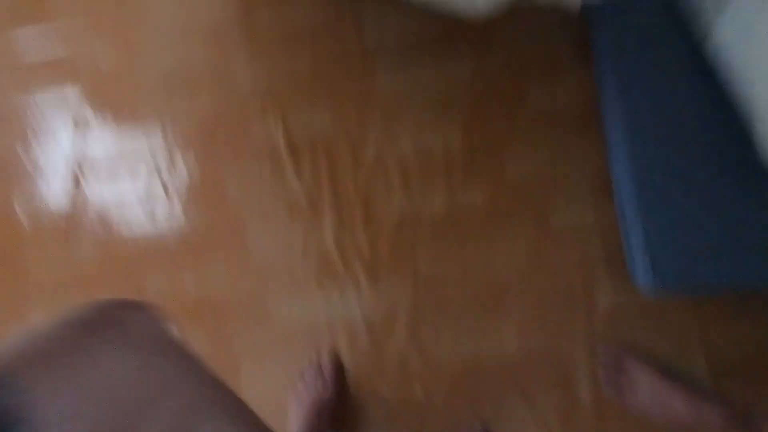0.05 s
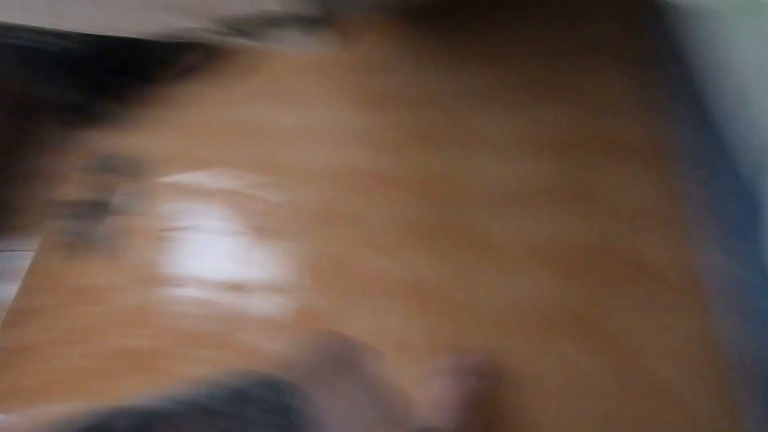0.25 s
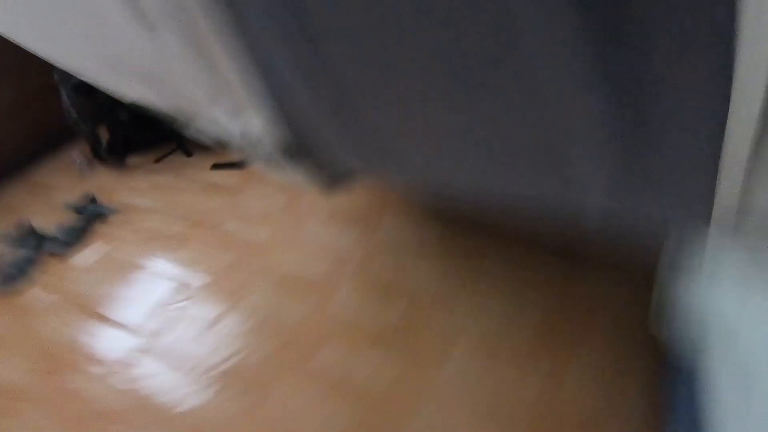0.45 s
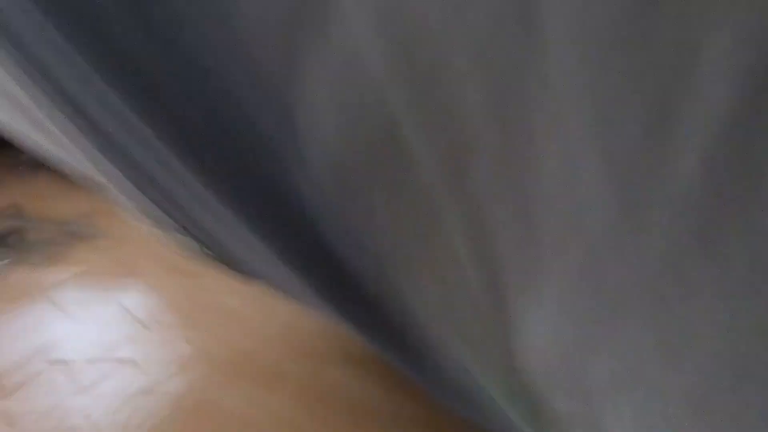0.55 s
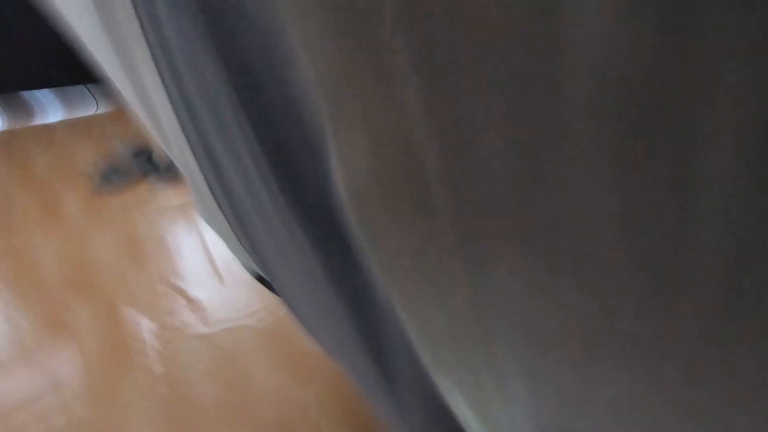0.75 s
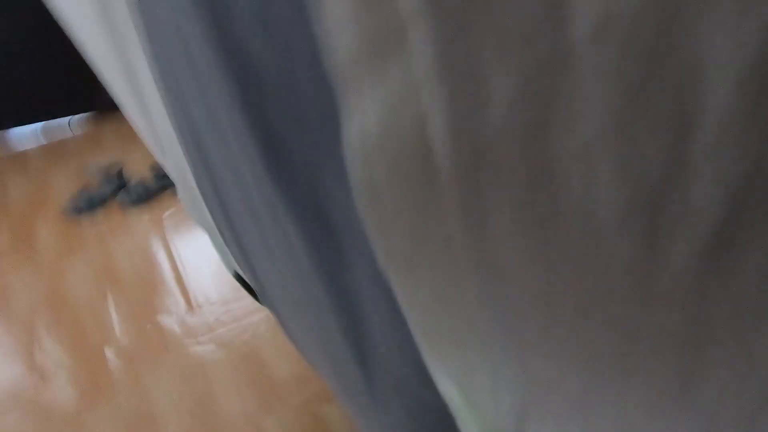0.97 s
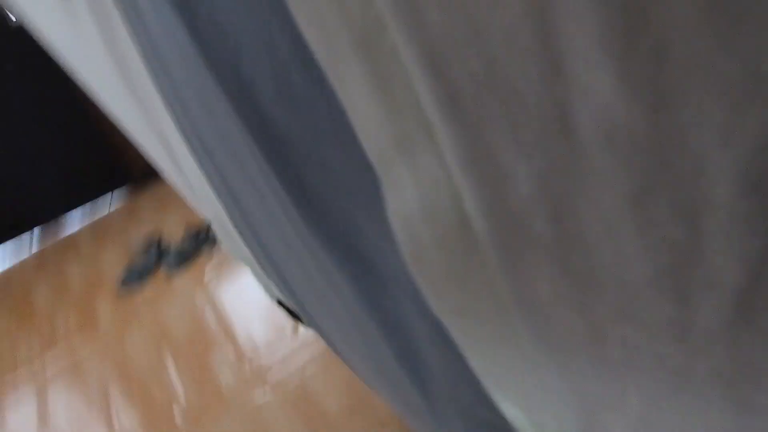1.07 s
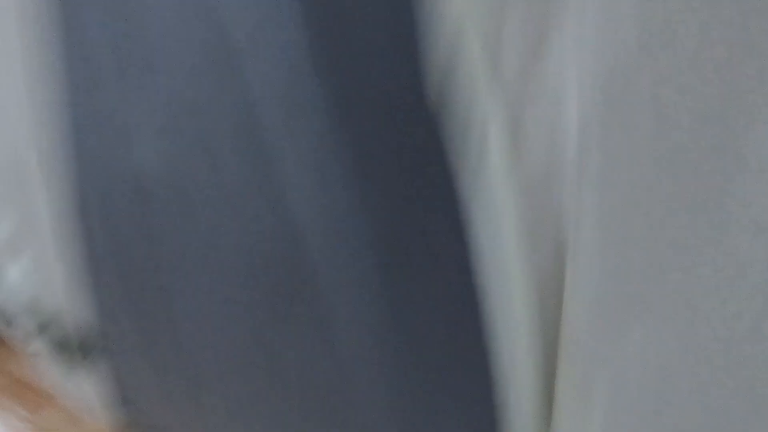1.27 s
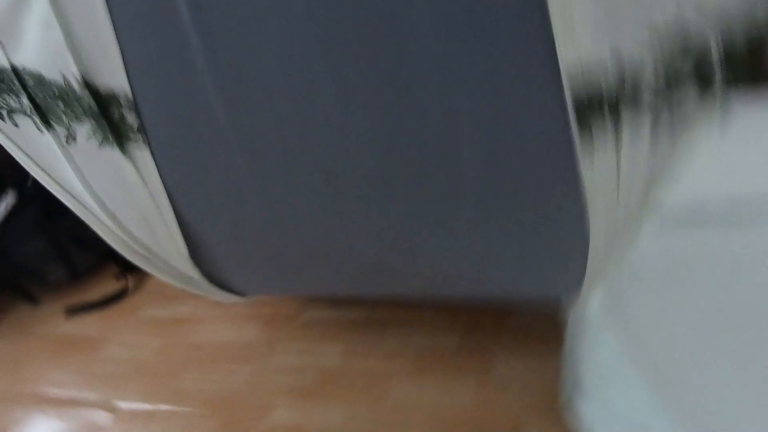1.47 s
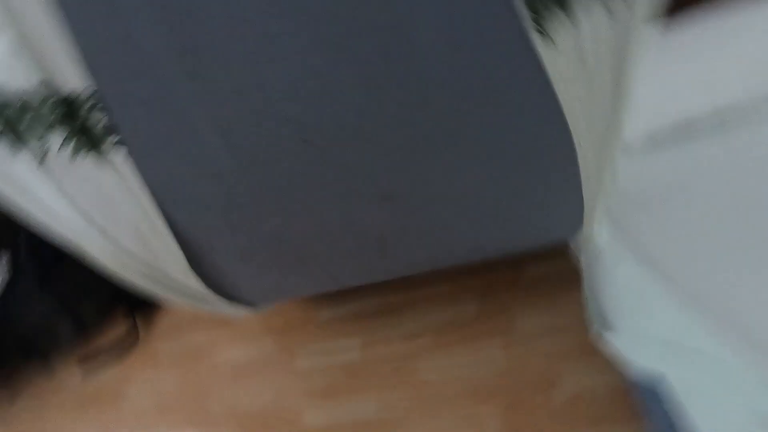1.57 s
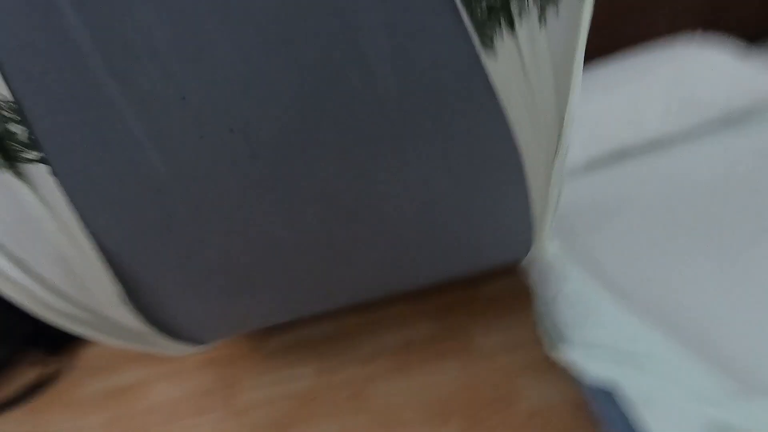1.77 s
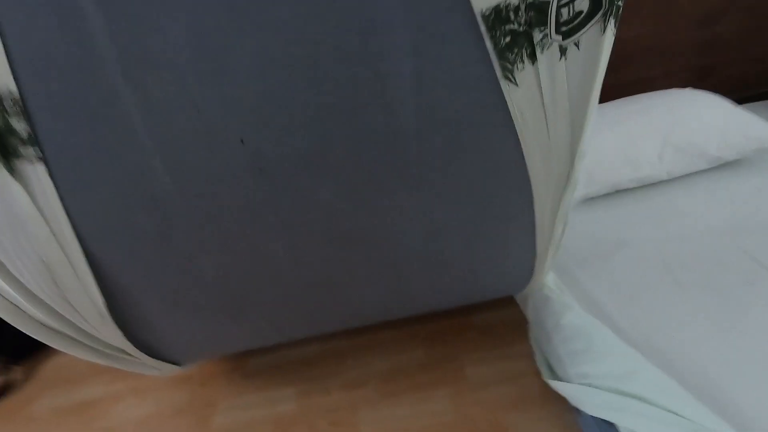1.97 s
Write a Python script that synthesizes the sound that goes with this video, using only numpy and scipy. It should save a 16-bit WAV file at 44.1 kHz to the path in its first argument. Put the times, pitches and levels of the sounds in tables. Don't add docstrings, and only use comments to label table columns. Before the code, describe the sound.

Close hand-held pickup in a small quiet room: a foam mattress is lifted, its sheet rustling lightly, low air bumps swelling to a sharp wooden knock, then dull taps, rubbing, tiny squeaks, another low buffet and near quiet.

```python
import sys
import numpy as np
from scipy import signal
from scipy.fft import rfft, irfft
from scipy.io import wavfile
from scipy.ndimage import uniform_filter1d

SR = 44100
rng = np.random.default_rng(int(sys.argv[2]) if len(sys.argv) > 2 else 0)


def volts_from_decibels(level):
    exponent = np.asarray(level, float) / 20
    return 10 ** exponent


def int16_out(signal):
    q = np.round(np.clip(np.atleast_2d(signal).T, -1, 1) * 32767)
    wavfile.write(sys.argv[1], SR, q.astype(np.int16))


N = 89037

# (start [s], length [s], level [dB], flutter top [Hz], slope [dB/octave])
GUSTS = [(0., 0.22, -48, 278, -3.5), (0.195, 0.19, -38, 257, -5.5), (0.336, 0.077, -32, 122, 7),
         (0.383, 0.15, -29.5, 285, -1.4), (0.505, 0.11, -29.5, 205, -4), (0.61, 0.14, -33.5, 226, -7.5),
         (0.662, 0.51, -48, 350, -8), (1.039, 0.12, -48, 307, -6), (1.131, 0.17, -39, 149, 2.5),
         (1.189, 0.22, -38, 261, -5), (1.364, 0.096, -32, 276, -7), (1.43, 0.15, -36, 257, -3.5),
         (1.55, 0.16, -42.5, 244, -4.5), (1.795, 0.084, -48.5, 92, -12), (1.884, 0.17, -48.5, 262, -1.4)]
# (centre [s], peak [dB], pitch [Hz], negative when the push comes first, length [cycles])
SHOVES = [(0.241, -43, -58, 0.4), (0.342, -23.5, -47.5, 2.4), (.372, -20.5, -47, 1.48),
          (0.445, -22, -110, 1.3), (0.4592, -18, 144, 2.93), (0.495, -25, 67, 1.4), (0.52, -20, 70, 0.84),
          (0.5364, -7, 65.5, 0.69), (0.552, -21, -53, 0.54), (0.564, -15.5, 31, 0.77),
          (0.4072, -27.5, 194, 1.2), (0.952, -36.5, -22, 0.84), (0.597, -23.5, -28.5, 2),
          (0.624, -23, -130, 1.07), (1.144, -28, 74, 1.17), (1.174, -32.5, 32, 0.81),
          (1.212, -26.5, -52, 0.75), (1.2244, -32, 89, 2.4), (1.26, -31, -68, 1.56),
          (1.29, -28.5, -110, 1.7), (1.316, -26.5, 126, 1.5), (1.389, -29.5, 91, 2.7),
          (1.401, -25, -150, 0.89), (1.4123, -16, -110, 0.53), (1.436, -20, -77, 0.44),
          (1.468, -23.5, -160, 1.8), (1.502, -28.5, -140, 1.9), (1.5249, -34, 151, 3.8),
          (1.604, -30, 46.5, 1.07), (1.636, -30.5, -70, 0.83), (1.915, -36.5, -170, 2.4),
          (2.004, -40, 62, 1.4)]
# (start [s], length [s], level [dB], tilt [dB/octave], share rubbing the housing [0-1])
STROKES = [(0., 0.065, -57, 0.8, 0.02), (0.033, 0.14, -54, 2.1, 0), (0.072, 0.13, -59, 0, 0),
           (0.151, 0.28, -60.5, 1.5, 0.01), (0.338, 0.21, -50, -0.5, 0.01), (0.498, 0.082, -42, -5, 0.3),
           (0.523, 0.026, -35, -1.5, 0.31), (0.535, 0.034, -41, -2, .4), (0.556, 0.07, -60, 5, 0.08),
           (0.612, 0.066, -44, 1, 0.2), (0.627, 0.25, -55.5, -1.5, 0),  (0.942, 0.091, -53, -7.5, 0.96),
           (1.004, 0.11, -47, -4.5, 0.3), (1.08, 0.097, -47.5, -2.5, 0.16), (1.118, 0.29, -58, -1, 0.13),
           (1.267, 0.24, -58.5, 0.5, 0), (1.331, 0.14, -59.5, 6, 0.25), (1.431, 0.12, -63.5, -0.3, 0.04),
           (1.587, 0.072, -65.5, -2, 0.35), (1.457, 0.53, -77, 4, 0.16), (1.82, 0.36, -63, -11, 0),
           (1.93, 0.13, -68, 4.5, 0.02)]
# (frequency [Hz], density [dB/Hz])
CLOTH_SPECTRUM = [(88, -31), (150, -9), (349, -12), (567, -18), (827, -15), (1700, -20), (3680, -27),
                  (4900, -30), (11000, -40), (14300, -68.5), (22000, -120)]
# (frequency [Hz], width [Hz], level [dB])
HOUSING_MODES = [(1780, 250, 17), (2600, 220, 21), (3990, 710, 15.5), (5720, 600, 18.5), (7940, 2700, 4.5)]
# (peak [s], level [dB], rise [dB/s], fall [dB/s], end [s])
SHEEN = [
    (0., -81, 100, 150, .06),
    (.12, -71, 160, 550, .17),
    (.2, -85, 100, 20, .33),
    (.44, -78, 55, 40, .521),
    (.53, -56, 6000, 420, .62),
    (.635, -84, 400, 300, .67),
    (1.959, -88, 5000, 5, 2.1),
]
# (frequency [Hz], level [dB], t60 [s])
KNOCK_MODES = [(531, 0.5, 0.023), (678, 2, 0.024), (903, -10.5, 0.036), (1246, -8, 0.078),
               (1720, -14.5, 0.098)]
# (time [s], peak [dB], pitch [Hz], t60 [s])
TAPS = [
    (0.243, -31.5, 297, 0.011),
    (0.403, -26, 239, 0.018),
    (0.6183, -30, 257, .016),
    (1.0559, -28, 327, 0.017),
    (1.0915, -31.5, 398, 0.0077),
    (1.1393, -32, 407, 0.0094),
]
# (pitch multiple [1], level [dB])
TAP_OVERTONES = [(1, 4), (1.8, -12), (3.3, -34)]
# (time [s], peak [dB], pitch [Hz])
TICKS = [(0.093, -52, 5070), (0.124, -50, 5000), (0.243, -48.5, 1470), (0.4027, -49, 4000),
         (0.403, -38, 2380), (0.4041, -35, 1360), (.402, -49.5, 7140), (0.5121, -46, 4770),
         (0.53, -34, 6100), (0.541, -23.5, 1350), (0.686, -49.5, 5400), (0.7354, -56, 4100),
         (.85, -64, 5300), (1.541, -66.5, 4460), (1.571, -66, 3500), (1.782, -65, 5900), (1.879, -65, 5500),
         (1.69, -55.5, 2600), (1.809, -61, 2520), (1.81, -49.5, 1260), (1.959, -54.5, 3820)]
# (start [s], length [s], level [dB], pitch [Hz], glide [Hz/s])
WHINES = [
    (1.007, .031, -53, 1788, 500),
    (1.04, .012, -63, 2850, 25000),
    (1.042, .016, -54, 1250, 0),
    (1.077, .013, -53, 1280, 0),
    (1.143, .014, -53, 1300, 20000),
    (1.184, .012, -46, 1420, -3000),
    (1.197, .012, -48, 1370, 2000),
    (1.215, .022, -56, 1370, 2000),
    (1.592, .022, -59, 1330, 0),
]
# (start [s], length [s], level [dB], pitch [Hz],
# width [Hz])
RUBS = [(.665, .12, -76, 6150, 160), (.782, .018, -59, 6000, 1500), (.818, .028, -66, 5900, 1700),
        (.95, .11, -65, 5850, 300), (.95, .09, -62, 4150, 400), (.96, .055, -63, 1780, 90),
        (.9, .055, -52, 430, 200), (.622, .045, -54, 5900, 500), (.535, .028, -50, 5900, 600),
        (1.045, .115, -59, 3400, 900), (1.1, .035, -58, 1700, 500), (1.18, .03, -57, 1500, 400),
        (1.208, .075, -61, 1360, 160)]
# (frequency [Hz], density [dB/Hz])
ROOM_SPECTRUM = [(12, -59), (20, 12.5), (525, -19.5), (674, -14), (1050, -17), (1880, -20.5), (2620, -28),
                 (8160, -36), (15000, -57.5)]

MIC_TOP_HZ = 8780
RISE, FALL = 0.13, 0.25
SOFT_RISE, SOFT_FALL = 0.29, 0.51
GUST_EDGE_ORDER = 7.3
FIBRES_PER_S, FIBRE_SPREAD_DB, FIBRE_SHARE = 3200, 1, 0.5
PATCH_DB = 3
CRACK_S, CRACK_LENGTH_S, CRACK_DB, CRACK_HZ = 0.526, 0.014, -55, 8000
AIR_DB, AIR_HZ, AIR_SLOPE_DB_PER_KHZ = -97.5, 9200, -4
KNOCK_S, KNOCK_DB = 0.528, -25.5
TAP_SAG, TAP_SAG_S = 0.73, 0.0013
TICK_T60_S, TICK_RISE_S, TICK_WIDTH = 0.013, 0.0001, 0.46
WHINE_WAVER = 0.025
ECHO_DB, ECHO_T60_S = -19, 0.75
ROOM_DB = -55.5


def evened(x):
    return x / np.sqrt(np.mean(x ** 2) + 1e-20)


def read(points, hz):
    f, value = np.transpose(points)
    return np.interp(np.log(hz + 1), np.log(f + 1), value)


def coloured(x, gain):
    return irfft(rfft(x) * gain(np.fft.rfftfreq(len(x), 1 / SR)), len(x))


def lowpass(f, top_hz, order):
    return 1 / (1 + (f / top_hz) ** order)


def add(mix, start_s, sound):
    part = mix[max(round(start_s * SR), 0):][:len(sound)]
    part += sound[:len(part)]


def resonate(x, hz, width_hz):
    turn = np.exp(2j * np.pi * np.cumsum(hz * np.ones(len(x))) / SR)
    r = np.exp(-np.pi * width_hz / SR)
    return 2 * (turn * signal.lfilter([1 - r], [1, -r], x / turn + 1e-18)).real


def swell(length_s, soft=0):
    u = np.arange(0, length_s, 1 / SR) / length_s
    rise = RISE + soft * (SOFT_RISE - RISE)
    fall = FALL + soft * (SOFT_FALL - FALL)
    return np.sin(np.pi / 2 * np.clip(np.minimum(u / rise, (1 - u) / fall), 0, 1)) ** 2


def ring(hz, db, t60_s, sag=0):
    t = np.arange(0, 0.12, 1 / SR)
    bent = t + sag * TAP_SAG_S * (1 - np.exp(-t / TAP_SAG_S))
    return -volts_from_decibels(db - 60 * t / t60_s) * np.sin(2 * np.pi * hz * bent) * (1 - np.exp(-t * hz * 3))


def shoves():
    out = np.zeros(N)
    t = np.arange(-0.06, 0.06, 1 / SR)
    for s, db, hz, cycles in SHOVES:
        envelope = np.exp(-(2 * t * abs(hz) / cycles) ** 2)
        add(out, s + t[0], volts_from_decibels(db) * np.sin(2 * np.pi * hz * t) * envelope)
    return out


def gusts():
    out, noise = np.zeros(N), rng.standard_normal(N + SR // 4)
    for s, length_s, db, top_hz, slope_db in GUSTS:
        def spectrum(f):
            tilt = volts_from_decibels(slope_db * np.log2(f / 60 + 0.11))
            rumble_cut = f ** 2 / (f ** 2 + 18 ** 2)
            return tilt * rumble_cut * lowpass(f, top_hz, GUST_EDGE_ORDER)

        shape = swell(length_s, soft=s > 0)
        air = coloured(noise, spectrum)[max(round(s * SR), 0):][:len(shape)]
        add(out, s, volts_from_decibels(db) * shape * evened(air))
    return out


def cloth():
    out = np.zeros(N)
    hiss, fine = rng.standard_normal((2, N))
    slips = (rng.random(N) < FIBRES_PER_S / SR) * np.sign(fine)
    slips = slips * volts_from_decibels(FIBRE_SPREAD_DB * rng.exponential(1, N))
    drive = (1 - FIBRE_SHARE) * hiss + FIBRE_SHARE * evened(slips)
    opened = evened(coloured(
        drive, lambda f: volts_from_decibels(read(CLOTH_SPECTRUM, f)) * (f > 150) * lowpass(f, MIC_TOP_HZ, 10)))
    rung = np.zeros(N)
    for k, (hz, width_hz, db) in enumerate(HOUSING_MODES):
        rung += (-1) ** k * volts_from_decibels(db) * resonate(resonate(drive, hz, width_hz), hz, 2 * width_hz)
    rung = evened(coloured(rung, lambda f: lowpass(f, 8600, 14)))
    sheen = evened(coloured(
        fine, lambda f: (f > 11240) * (f < 15650) * volts_from_decibels(-4.5 * abs(f - 13100) / 1000)))
    for s, length_s, db, tilt_db, share in STROKES:
        shape = volts_from_decibels(db) * swell(length_s, soft=share < 0.35)
        start = max(round(s * SR), 0)
        span = slice(start, start + len(shape))
        part = np.sqrt(1 - share) * opened[span] + np.sqrt(share) * rung[span]
        part = coloured(part, lambda f: volts_from_decibels(tilt_db * np.log2(f / 2000 + 0.097)))
        add(out, s, shape[:len(part)] * evened(part))
    return out, sheen


def patchy(x):
    z = signal.stft(x, nperseg=256)[2]
    field = rng.standard_normal(z.shape[::-1])
    field = uniform_filter1d(uniform_filter1d(field, size=9, axis=0), size=4, axis=1)
    return signal.istft(z * volts_from_decibels(PATCH_DB * evened(field).T), nperseg=256)[1][:N]


def knock():
    out = np.zeros(N)
    wood = sum(ring(*mode) for mode in KNOCK_MODES)
    for late_s, db in (0, 0.5), (0.005, 0.4), (0.011, 0.5):
        add(out, KNOCK_S + late_s, volts_from_decibels(KNOCK_DB + db) * wood)
    return out


def taps():
    out = np.zeros(N)
    for s, db, hz, t60_s in TAPS:
        body = sum(ring(hz * k, d, t60_s / np.sqrt(k), TAP_SAG) for k, d in TAP_OVERTONES)
        add(out, s, volts_from_decibels(db + 7) * body)
    return out


def ticks():
    out, t = np.zeros(N), np.arange(900) / SR
    envelope = volts_from_decibels(1.5 - 60 * t / TICK_T60_S) * (1 - np.exp(-t / TICK_RISE_S))
    for s, db, hz in TICKS:
        grit, width_hz = rng.standard_normal(900), TICK_WIDTH * hz
        body = resonate(resonate(grit, hz, width_hz), hz, width_hz)
        add(out, s, volts_from_decibels(db) * envelope * evened(body))
    return out


def whines():
    out, waver = np.zeros(N), evened(uniform_filter1d(rng.standard_normal(N), size=60))
    for s, length_s, db, hz, glide_hz_per_s in WHINES:
        shape = swell(length_s)
        pitch_hz = hz + glide_hz_per_s * np.arange(len(shape)) / SR
        pitch_hz = pitch_hz * (1 + WHINE_WAVER * waver[round(s * SR):][:len(shape)])
        add(out, s, volts_from_decibels(db + 3.5) * shape * np.sin(2 * np.pi * np.cumsum(pitch_hz) / SR))
    return out


def rubs():
    out, grit = np.zeros(N), rng.standard_normal(N)
    for s, length_s, db, hz, width_hz in RUBS:
        shape = swell(length_s)
        part = grit[round(s * SR) - 400:][:len(shape) + 400]
        whistle = resonate(resonate(part, hz, width_hz), hz, 2 * width_hz)[-len(shape):]
        add(out, s, volts_from_decibels(db) * shape * evened(whistle))
    return coloured(out, lambda f: lowpass(f, 7800, 10))


def top_layer(sheen):
    t, (grit, air) = np.arange(N) / SR, rng.standard_normal((2, N))
    level = np.zeros(N)
    for s, db, rise, fall, end_s in SHEEN:
        slope_db = np.maximum(rise * (s - t), fall * (t - s))
        level += volts_from_decibels(db - slope_db) * np.clip((end_s - t) * 200, 0, 1)
    out, shape = level * sheen, swell(CRACK_LENGTH_S)
    crack = evened(coloured(grit, lambda f: (f > CRACK_HZ) * volts_from_decibels(-1.2 * f / 1000)))
    add(out, CRACK_S, volts_from_decibels(CRACK_DB) * shape * crack[:len(shape)])
    air = coloured(air, lambda f: (f > AIR_HZ) * volts_from_decibels(AIR_SLOPE_DB_PER_KHZ * f / 1000))
    return out + volts_from_decibels(AIR_DB) * evened(air)


def echo(x):
    t = np.arange(SR // 3) / SR
    reflections = rng.choice([-1., 1.], len(t)) * (rng.random(len(t)) < 0.05)
    reflections = reflections * volts_from_decibels(-60 * t / ECHO_T60_S) * (t > 0.004)
    reflections = coloured(reflections, lambda f: lowpass(f, 5000, 2))
    return signal.fftconvolve(x, reflections / np.linalg.norm(reflections))[:N]


def room_tone():
    noise = rng.standard_normal(N)
    return volts_from_decibels(ROOM_DB) * evened(coloured(
        noise, lambda f: volts_from_decibels(read(ROOM_SPECTRUM, f)) * (f > 15) * lowpass(f, MIC_TOP_HZ, 10)))


def scene():
    rustle, sheen = cloth()
    hits = coloured(knock() + taps() + ticks(), lambda f: lowpass(f, MIC_TOP_HZ, 10))
    near = patchy(rustle) + hits + whines() + rubs()
    mix = shoves() + gusts() + near + top_layer(sheen)
    mix = mix + volts_from_decibels(ECHO_DB) * echo(near) + room_tone()
    return mix[None]


def roll_off(x):
    return signal.sosfilt(signal.butter(12, 15700, fs=SR, output="sos"), x)


def record(dry):
    return roll_off(dry)


dry = scene()
out = record(dry)
int16_out(out)
```